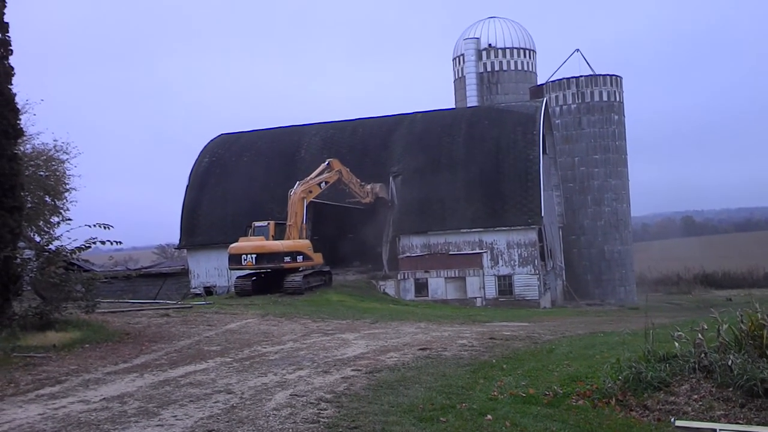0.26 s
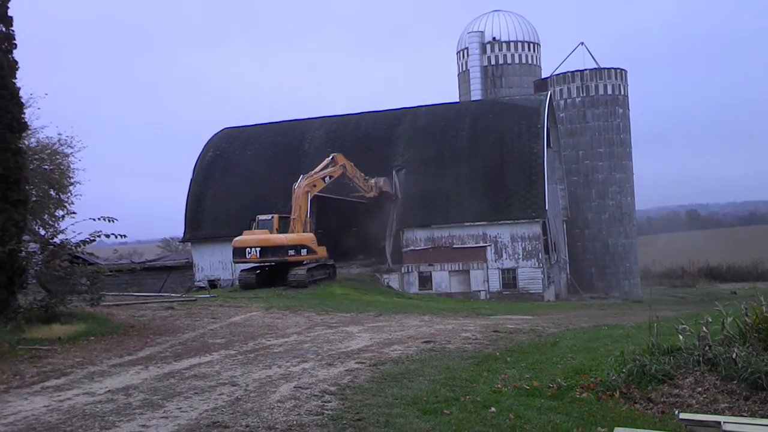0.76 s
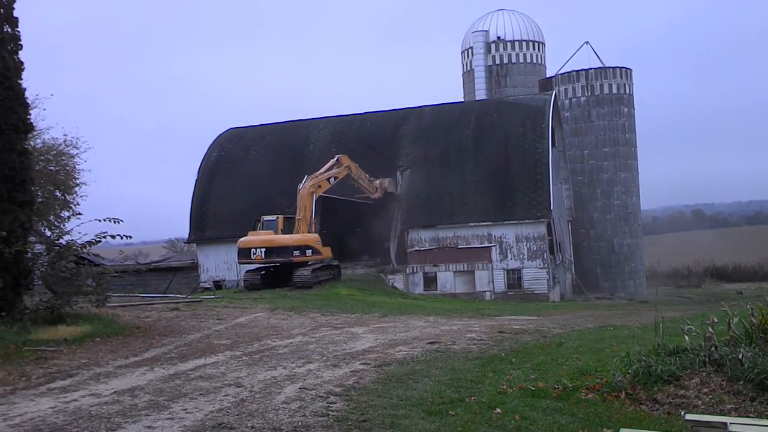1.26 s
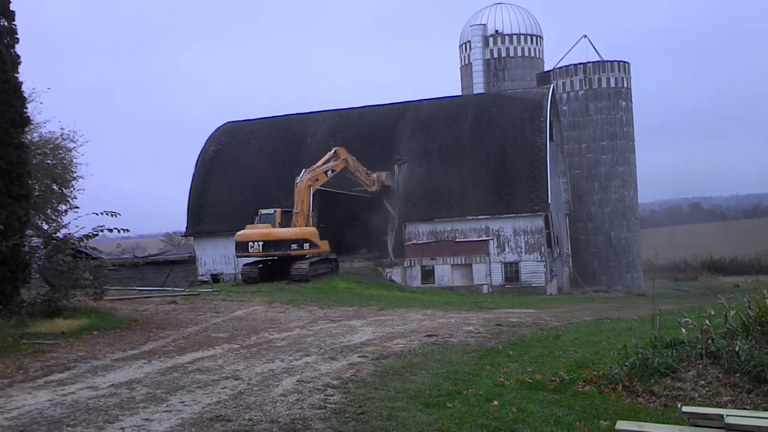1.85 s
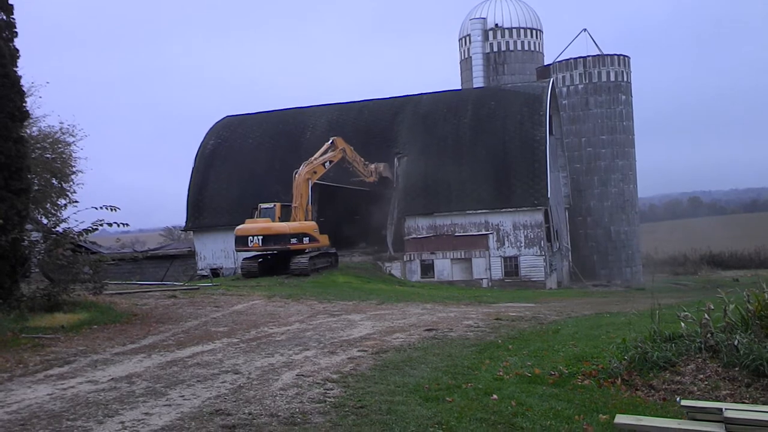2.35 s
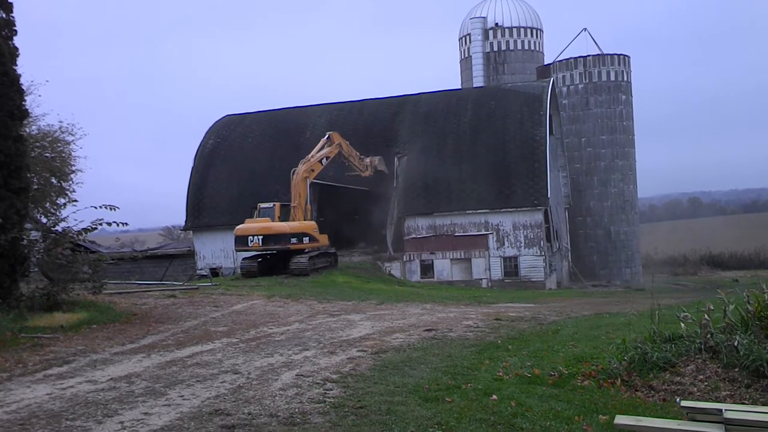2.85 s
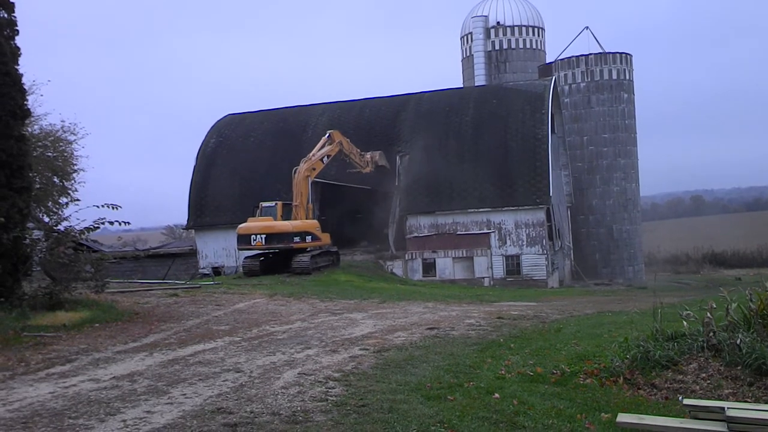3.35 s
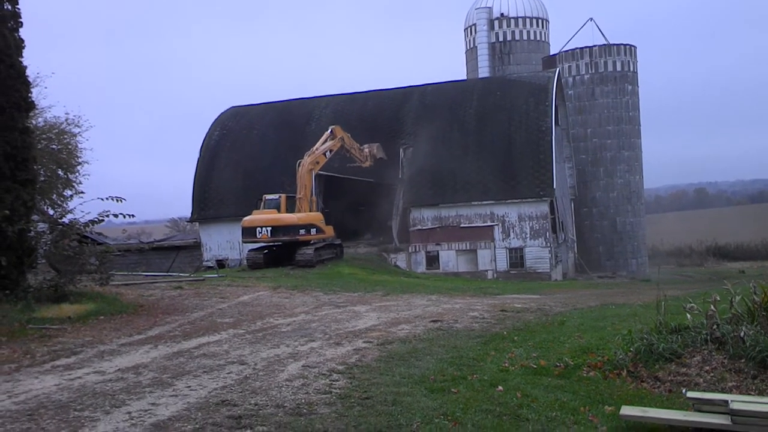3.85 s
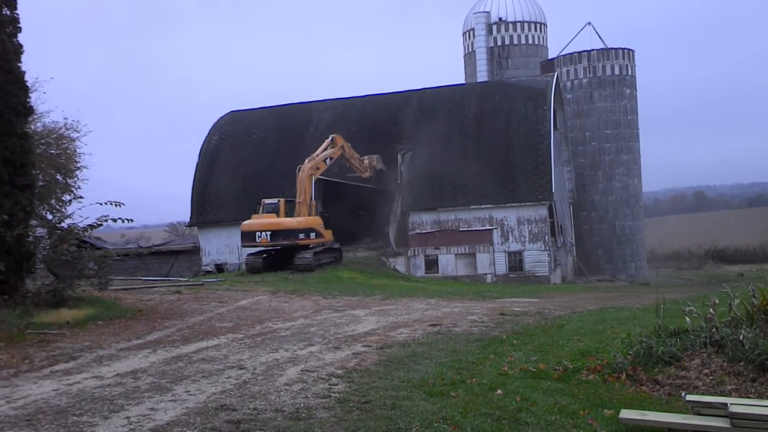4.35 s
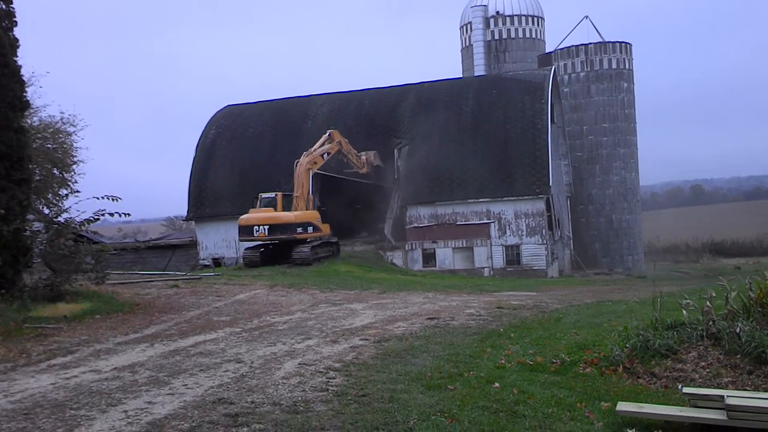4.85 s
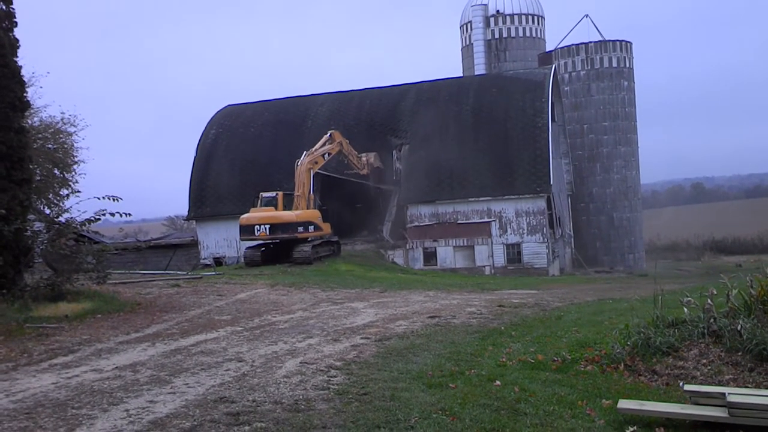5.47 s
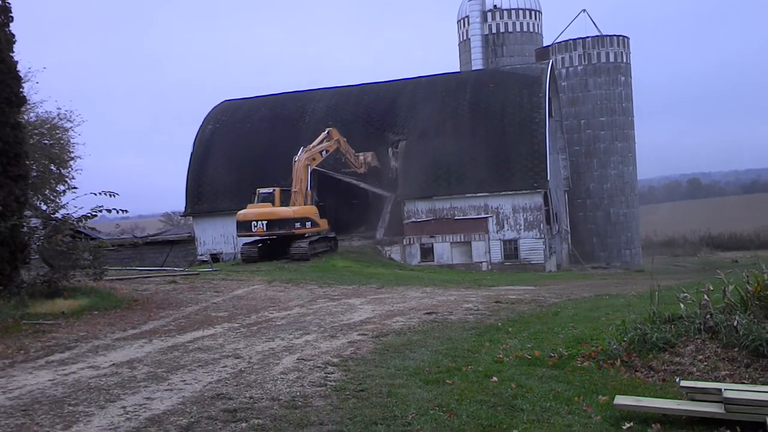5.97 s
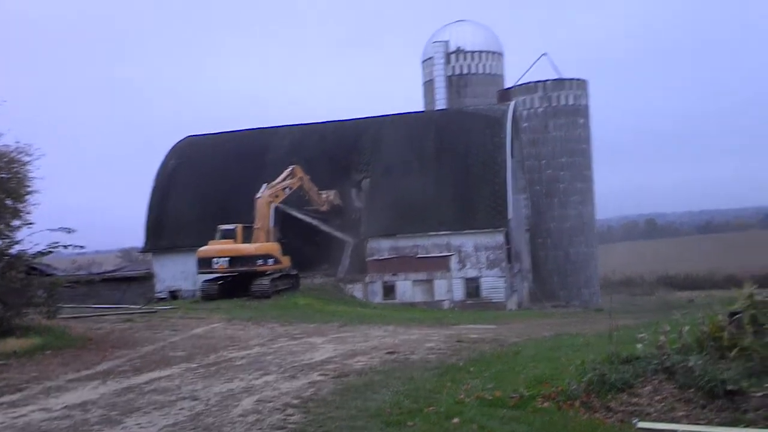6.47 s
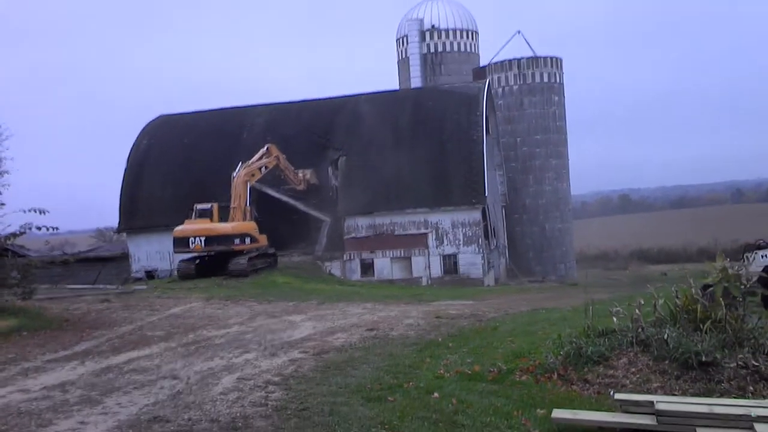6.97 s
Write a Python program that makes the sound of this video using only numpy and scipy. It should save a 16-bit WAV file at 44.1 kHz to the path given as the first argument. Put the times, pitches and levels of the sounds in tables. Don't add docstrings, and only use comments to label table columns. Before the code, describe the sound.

Steady low engine drone outdoors, with sharp dry wood cracks early, a lull, one very loud timber break, then knocking boards and sliding splinters.

```python
import sys
import numpy as np
from scipy import signal
from scipy.fft import next_fast_len
from scipy.io import wavfile
from scipy.ndimage import uniform_filter1d

SR = 44100
rng = np.random.default_rng(int(sys.argv[2]) if len(sys.argv) > 2 else 0)


def master_out(mix):
    frames = np.transpose(np.atleast_2d(mix))
    ceiling = np.clip(frames, -1, 1)
    pcm = np.round(ceiling * 32767).astype(np.int16)
    wavfile.write(sys.argv[1], SR, pcm)


def volts_from_decibels(level):
    exponent = np.asarray(level, float) / 20
    return 10 ** exponent


N = 317961
T = np.arange(N) / SR

# f/Hz, likeness [0..1]
LIKENESS = [(60, .98), (300, .9), (1000, .84), (3500, .78), (5400, .66), (9000, .68), (15000, .45)]


def evened(x):
    return x / np.sqrt(np.mean(x ** 2) + 1e-20)


def read(points, hz):
    f, value = np.transpose(points)
    return np.interp(np.log(hz + 1), np.log(f + 1), value)


def curves(rows):
    s, *columns = np.transpose(rows)
    return [np.interp(T, s, c) for c in columns]


def add(mix, s, sound):
    part = mix[max(round(s * SR), 0):][:len(sound)]
    part += sound[:len(part)]


def slow(most_hz):
    knots = rng.standard_normal(N // 100 + 402)
    lowpass = signal.butter(2, min(most_hz, 200), fs=SR / 100, output="sos")
    knots = signal.sosfilt(lowpass, knots)[400:]
    return np.interp(np.arange(N) / 100, np.arange(len(knots)), evened(knots))


def band(x, low_hz, high_hz):
    bandpass = signal.butter(2, [low_hz, min(high_hz, 20000)], "band", fs=SR, output="sos")
    return signal.sosfilt(bandpass, x)


def partner(left, other, same):
    return same * left + np.sqrt(1 - same ** 2) * other


def noise(colour, patchy_db, size):
    hz = np.fft.rfftfreq(size, 1 / SR)
    a, b, c, d, patches = rng.standard_normal((N // (size // 4) + 5, len(hz), 5)).T
    patches = uniform_filter1d(patches, size=size // 100, axis=0)
    patches = evened(uniform_filter1d(patches, size=6000 // size * 4, axis=1))
    same = np.clip(read(LIKENESS, hz), 0, 1)[:, None]
    left = a + 1j * b
    z = np.array([left, partner(left, c + 1j * d, same)])
    z *= volts_from_decibels(read(colour, hz)[:, None] + patchy_db * patches)
    z /= np.sqrt(hz + 10)[:, None]
    return evened(signal.istft(z, nperseg=size, noverlap=size * 3 // 4)[1][:, :N])


def scatter(per_s, spread_db, fall_s):
    landed = rng.random(N) < per_s / SR
    hits = volts_from_decibels(spread_db * np.minimum(rng.exponential(1, N), 4)) * landed
    return evened(signal.lfilter([1], [1, -np.exp(-1 / (fall_s * SR))], hits))


def valve(start_s, length_s):
    move_s = 0.092
    travel = np.minimum(T - start_s, start_s + length_s - T) / move_s
    return np.sin(np.pi / 2 * np.clip(travel, 0, 1))


def engine():
    # t/s, f/Hz, hum level/dB
    firing = [(0, 87.96, -19.5), (1.02, 88.3, -18.5), (1.63, 88.16, -20.5), (1.84, 86.05, -19.5),
              (2.3, 86, -19), (2.91, 86.9, -19), (3.03, 88.3, -18), (3.23, 88, -20.5), (3.65, 88.2, -19),
              (4.12, 89.5, -21.5), (5.2, 89.63, -21), (6.4, 89.7, -21), (7.21, 89.5, -21)]
    sixths_of_firing = [3, 8, 10.25, 15, 18, 20]
    orders_db = [-31, -26.5, -23.5, -22.5, -34, -34]
    # t/s,
    # length/s, level/dB, order [x firing rate], wander/Hz
    whines = [(-.1, 1.36, -41.5, 12.42, 4), (1.75, 1.05, -47, 9.02, 7), (2.78, .44, -42, 8.95, 6),
              (3.27, .36, -41, 8.86, 5), (1.7, 1.45, -45, 12.15, 12), (-.1, 2.2, -46, 15.4, 43),
              (2.4, .75, -43, 15.4, 35), (3.2, .55, -43, 15, 30), (4.6, 2.7, -48, 15.4, 50),
              (1.75, .6, -48.5, 19.7, 25), (1.7, 2.2, -54, 32.5, 150), (3.65, .4, -44, 4.25, 25),
              (4.2, 3.2, -36, 1.69, 1.5), (.1, 2.5, -47, 3.01, 1.5), (1.1, .6, -49, 12.4, 10),
              (3.45, .3, -47, 10.55, 6), (6.25, .75, -48, 12.62, 5)]
    hz, hum_db = curves(firing)
    turns = 2 * np.pi * np.cumsum(hz + .5 * slow(11.3)) / SR
    out = volts_from_decibels(hum_db + 0.99 * slow(23)) * np.cos(turns)
    out += volts_from_decibels(hum_db - 17 + 1.5 * slow(8.6)) * np.cos(2 * turns + 0.15)
    for sixths, db in zip(sixths_of_firing, orders_db):
        phase = 2 * np.pi * rng.random()
        out += volts_from_decibels(hum_db + db + 2.5 * slow(4)) * np.cos(sixths * turns / 6 + phase)
    for start_s, length_s, db, order, width_hz in whines:
        phase = 2 * np.pi * np.cumsum(order * hz + width_hz * slow(30.12)) / SR
        out += valve(start_s, length_s) * volts_from_decibels(db + 1.1 * slow(5.5)) * np.cos(phase)
    return np.sqrt(2) * out, turns


def rubble(turns):
    # f/Hz, level/dB per third octave
    rumble_colour = [(25, -33), (42, -30), (62, -6), (90, 1.5), (125, 1.5), (160, 2), (210, 2.5),
                     (260, -4.5), (350, 0), (500, -9.5), (700, -17)]
    boards_colour = [(350, -16), (520, -15), (650, -8), (800, -0.5), (1000, 1.5), (1200, -2.5), (1400, 2.5),
                     (1600, -13), (2200, -16)]
    splinters_colour = [(1100, -21.5), (1600, 5), (2200, 1), (2900, 1), (3300, -8.5), (4500, -24),
                        (6500, -35)]
    dust_colour = [(3200, -12), (4600, -15), (5500, -16), (6600, -4), (8000, -1), (11000, 3), (14000, 3.5),
                   (16500, 2.5)]
    # t/s, effort/dB
    effort = [(0, -2), (.82, 1), (1.17, 1.5), (1.36, -4.5), (1.95, 0.5), (2.39, 3), (3.19, -3.5), (3.55, 0),
              (4, -5.5), (4.2, 4.5), (4.56, 0.5), (4.68, 12.5), (4.85, 3.5), (5.4, 0.5), (6.1, 4),
              (6.45, -2.5), (6.77, -5.5), (7.21, 3)]
    rest_db = [-35.5, -36, -40.5, -42.5]
    follow = [.3, .7, .9, 1.01]
    # start/s, end/s
    quiet_s = (1.3, 4.05)
    effort_db = curves(effort)[0]
    rumble_db, boards_db, splinters_db, dust_db = (db + share * effort_db for db, share in zip(rest_db, follow))
    throb = 1 + 0.046 * np.cos(turns / 2) + 0.041 * np.cos(turns)
    falling = (T < quiet_s[0]) | (T > quiet_s[1])
    pieces = .55 * scatter(per_s=30, spread_db=0, fall_s=0.007) * falling
    out = volts_from_decibels(rumble_db + 2.5) * noise(rumble_colour, patchy_db=0.5, size=2048)
    out += volts_from_decibels(boards_db) * noise(boards_colour, patchy_db=0.67, size=512) * evened(throb + .15 * pieces)
    splinters = noise(splinters_colour, patchy_db=1, size=512)
    out += volts_from_decibels(splinters_db - 0.6) * splinters * evened(throb + .2 * pieces)
    dust = noise(dust_colour, patchy_db=-1, size=512)
    return out + volts_from_decibels(dust_db + 1.9) * dust * evened(throb + .25 * pieces)


def wind():
    # peak t/s, level/dB
    gusts = [
        (5.7, -34),
        (6.0, -28),
        (6.26, -21),
    ]
    breeze_db, rise_s, fall_s = -43.5, 0.097, 0.11
    lumps = rng.standard_normal((3, N))
    shared, left, right = (evened(band(band(v, 31, 55), 28, 58)) for v in lumps)
    force = volts_from_decibels(breeze_db + 3 * slow(1.5))
    for s, db in gusts:
        force += volts_from_decibels(db) * np.exp(np.minimum((T - s) / rise_s, (s - T) / fall_s))
    return volts_from_decibels(-6.5) * force * (shared + 0.36 * np.array([left, right]))


def cracks():
    # t/s, peak level/dB
    thin_snaps = [(0.203, -24), (0.308, -30), (.4604, -28), (0.605, -15), (0.6136, -21), (.861, -20.5),
                  (.977, -27), (1.048, -21), (1.168, -15), (1.181, -28), (1.2204, -27), (2.1176, -27),
                  (4.2746, -10), (4.4027, -17), (4.5208, -14), (4.7242, -19), (5.056, -18.5), (5.3228, -21),
                  (5.467, -24), (5.864, -22), (6.174, -23), (6.5633, -30), (7.157, -24)]
    # t/s, peak level/dB
    lath_cracks = [(0.2203, -22), (0.742, -22), (0.8127, -22), (.9497, -26), (1.002, -22), (1.2053, -14),
                   (1.2082, -13), (1.838, -24), (2.382, -22), (4.138, -23), (4.357, -19.5), (4.3817, -10),
                   (4.4548, -9.5), (5.1597, -16.5), (5.3027, -30), (5.3837, -23.5), (5.541, -34),
                   (5.5835, -27), (5.92, -17), (5.966, -30), (6.1744, -23.5), (6.2235, -22), (6.496, -20),
                   (6.8465, -24), (7.0743, -19)]
    # t/s, peak level/dB
    board_breaks = [(0.0595, -25), (4.5211, -20.5), (.9497, -29), (.601, -11), (0.714, -25), (1.1266, -31),
                    (2.4009, -29), (4.166, -22), (4.392, -14.5), (4.5275, -25), (5.8631, -28),
                    (5.8768, -30), (5.9334, -25), (6.133, -25), (6.3157, -28), (6.7685, -31),
                    (6.7857, -29.5), (6.9823, -29), (7.0213, -22), (7.031, -25)]
    # t/s, peak level/dB
    wall_crunches = [(.2158, -31), (.275, -37), (.283, -34.5), (.4529, -35), (.459, -34), (5.92, -34),
                     (4.0853, -40), (4.2354, -34), (4.562, -33), (4.881, -35), (5.1122, -36), (5.1266, -33),
                     (5.5014, -38), (6.2594, -39), (7.0225, -33)]
    # body level/dB, t60/s
    thickness = [
        (-10.5, 0.023),
        (-4.5, .021),
        (.5, .025),
        (7, 0.03),
    ]
    # t/s, peak level/dB, body level/dB, t60/s
    rafter = [
        (4.6068, 3, -3, 0.025),
        (4.6104, 3.5, -7.5, 0.037),
        (4.6191, 5, -9, 0.034),
        (4.6251, 3, -2, .019),
        (4.6334, -6, -5, 0.04),
        (4.6482, -10, -10, .03),
        (4.6837, -9, -7, 0.045),
    ]
    events = list(rafter)
    for rows, wood in zip((thin_snaps, lath_cracks, board_breaks, wall_crunches), thickness):
        events += [(*row, *wood) for row in rows]
    out, t = np.zeros((N, 2)), T[:SR // 16, None]
    fibres = rng.standard_normal((3, N + len(t)))
    fibres = fibres[0] + 0.74 * fibres[1:]
    body = evened(band(fibres, 1290, 3760)).T
    bright = evened(band(fibres, 4230, 13700)).T
    top = evened(band(fibres, 8700, 20000)).T
    click = 2.5 * signal.unit_impulse(300)
    for s, db, body_db, t60_s in events:
        at = slice(round(s * SR), round(s * SR) + len(t))
        envelope = volts_from_decibels(db - 3.5 - 60 * t / (0.83 * t60_s)) * np.minimum(t / 0.00026, 1)
        thin = np.clip(-body_db / 16, 0, 1)
        build = np.minimum(t / 0.0024, 1)
        parting = thin * top[at] + (1 - 0.49 * thin) * bright[at]
        parting += volts_from_decibels(body_db + 6.5) * build * body[at]
        add(out, s, envelope * parting)
        add(out, s + .0004, volts_from_decibels(db + .8) * band(click, 3000 + 3000 * thin, 20000)[:, None])
    return out.T


def knocks():
    # t/s, peak level/dB, f/Hz
    struck_boards = [(0.214, -15.5, 790), (0.281, -17.5, 715), (0.4585, -12, 838), (0.603, -15.5, 833),
                     (0.714, -25, 850), (.226, -23, 900), (.452, -20, 806), (.473, -24, 750),
                     (.815, -27, 1095), (.904, -26, 900), (.973, -24, 820), (1.003, -22, 1100),
                     (1.146, -24, 800), (5.604, -21, 960), (5.618, -21, 900), (5.647, -23, 1000),
                     (5.665, -23, 950), (5.798, -22, 851), (5.93, -24, 1810), (6.316, -23, 900),
                     (.743, -29, 1900), (1.169, -26, 3300), (1.208, -19, 2300), (.602, -22, 1600),
                     (4.277, -22, 1400), (4.185, -25, 900), (4.888, -23, 600), (4.93, -22.5, 880),
                     (4.94, -25, 900), (4.976, -23, 880), (4.987, -23, 850), (5.008, -25, 790),
                     (5.1596, -25, 2890), (5.218, -25, 750), (5.327, -28, 850), (5.369, -30, 750),
                     (5.984, -25.5, 720), (6.076, -27, 950), (6.1, -25, 720), (6.227, -24, 1000),
                     (6.268, -26, 894), (7.0212, -20, 2090), (7.034, -21, 755), (5.5012, -26, 1650),
                     (6.0584, -27, 1800), (6.1343, -22, 1480), (6.1745, -24, 1940), (6.2266, -26, 1550),
                     (6.2595, -27, 1500), (5.968, -31, 3450), (5.767, -31, 3000), (4.4555, -21, 2000),
                     (6.068, -25, 900), (6.085, -25, 1050),
                     (0.953, -17, 776), (0.993, -19.5, 1020), (1.13, -22, 860), (4.052, -20.5, 890),
                    (4.113, -22, 829), (4.135, -25, 760), (4.162, -18.5, 850), (4.297, -23, 822),
                    (4.392, -28, 950), (4.453, -19, 1316), (4.519, -16.5, 860), (4.61, -16, 1004),
                    (4.802, -23.5, 847), (4.877, -23, 867), (4.917, -25, 860), (4.964, -23, 850),
                    (5.545, -25, 947), (5.581, -21, 940), (5.776, -21, 930), (6.497, -20.5, 814),
                    (6.983, -19.5, 998), (7.024, -17.5, 752), (7.065, -18, 990), (7.158, -22, 854),
                    (7.174, -21, 965)]
    # t/s, peak level/dB, f/Hz, t60/s, build-up/cycles
    beams = [(4.1, -22, 210, 0.29, 5), (3.3, -36, 212, 0.3, 5), (4.44, -22, 140, 0.45, 6),
             (5, -33, 130, 0.41, 6), (5.57, -19, 226, 0.26, 5.1), (5.949, -17, 60, 0.38, 2.6),
             (6.17, -20, 36.6, 0.48, 3), (6.261, -23, 310, 0.36, 4.9), (6.3, -23, 152, 0.43, 5.1),
             (5.8635, -17.5, 2050, 0.075, 2.1), (5.876, -19.5, 1600, 0.07, 2.2),
             (5.19, -21.5, 680, .05, 2.1), (4.61, -20, 330, 0.1, 1.2), (4.61, -30, 27, .3, 1.1)]
    board_t60_s, board_cycles = .04, 1.63
    beam_hz, dull_db = 400, -8
    plank_hz = 1500
    modes = ((1, 2), (1.22, -6), (.8, -6.5), (1.6, -6.5), (2.3, -10), (3.1, -14))
    events = [(*row, board_t60_s, board_cycles) for row in struck_boards]
    out, t = np.zeros((N, 2)), T[:SR // 5, None]
    for s, db, hz, t60_s, cycles in [*events, *beams]:
        ring = 0
        for ratio, mode_db in modes:
            dulled = (ratio != 1) * (hz < beam_hz) + (ratio > 1.5) * (hz > plank_hz)
            mode = np.sin(2 * np.pi * (ratio * hz * t + rng.random()))
            ring = ring + volts_from_decibels(mode_db + dulled * dull_db) * mode
        fall_s = np.clip(t60_s * min(1, plank_hz / hz), .015, .5)
        add(out, s, volts_from_decibels(db - 60 * t / fall_s) * np.minimum(t * hz / cycles, 1) * ring)
    return out.T


def yard(x):
    # f/Hz, t60/s
    decay = [(300, 0.4), (1000, 0.54), (3000, 0.7), (6000, 0.45), (12000, 0.37)]
    taps = np.zeros((2, SR // 2))
    at = np.arange(200, SR // 2 - 20, 20)
    at = at + rng.integers(0, 20, (2, len(at)))
    np.put_along_axis(taps, at, rng.choice([-1., 1.], at.shape), 1)
    hz, t, z = signal.stft(taps, SR, nperseg=256)
    tail = signal.istft(z * volts_from_decibels(-60 * t / read(decay, hz)[:, None]), SR, nperseg=256)[1]
    return signal.fftconvolve(x[None], tail / np.linalg.norm(tail[0]), axes=1)[:, :N]


def showers():
    # t/s, length/s, level/dB, centre f/Hz,
    # width/Hz
    debris_falls = [(0.612, 0.12, -40, 7060, 2500), (1.608, .014, -38, 2100, 900),
                    (1.618, .022, -32.5, 2500, 1800), (5.52, .24, -38, 3700, 900),
                    (5.56, .14, -34, 1700, 700), (4.67, .04, -30, 7000, 9000), (.6, .07, -37, 1900, 1600),
                    (1.75, 1.1, -50, 8500, 5000), (3.2, .7, -51, 12000, 6000),
                    (4.712, 0.12, -29, 5700, 2000), (5.8, .5, -46, 4000, 2200),
                    (4.605, .06, -28, 600, 400), (1.17, .18, -45, 11000, 8000),
                    (4.72, .1, -33, 9000, 5000), (.605, .12, -40, 10000, 5000),
                    (.45, .03, -40, 8000, 8000), (4.74, .26, -37, 4800, 2600),
                    (5.5, 0.36, -39, 3500, 1500), (5.565, 0.17, -30, 2500, 2200),
                    (5.58, 0.18, -39, 6800, 3500), (6.764, 0.04, -40.5, 3600, 3000),
                    (7.019, 0.12, -39, 3750, 1800), (4.09, 0.17, -28, 800, 350),
                    (4.72, 0.2, -33.5, 850.1, 398), (4.9, .18, -36, 880, 300),
                    (5.53, .17, -30.5, 970, 350), (5.63, 0.077, -29, 950, 400),
                    (5.72, 0.6, -34.5, 850, 400), (6.98, 0.24, -37, 912, 400),
                    (4.06, 0.35, -37.5, 2000, 900),
                    (4.07, 0.15, -32, 230, 230), (4.6, 0.091, -30, 240, 260), (5.5, 0.22, -33, 250, 250),
              (5.56, .3, -36, 360, 130), (5.75, .55, -33.5, 250, 300), (7.0, 0.38, -32.5, 290, 270),
              (4.63, .28, -34, 2600, 2300), (4.62, 0.22, -32, 8500, 6600), (5.52, 0.28, -32, 1640, 1000),
              (5.862, .04, -27.5, 2000, 900), (4.606, .045, -22, 4600, 1700), (4.608, .05, -20, 1700, 700),
              (4.63, 0.11, -33, 4600, 1500), (5.84, .5, -43, 2070, 1410), (7.01, .25, -36, 2100, 1200),
              (.4, 0.58, -40.5, 890, 503), (.94, .12, -37, 2900, 3000), (4.1, 0.25, -41, 9000, 7000),
              (6.04, .3, -36, 1600, 1400), (4.37, 0.27, -36, 520, 400), (4.85, 0.086, -33, 345, 300)]
    out = np.zeros((N, 2))
    fine = .5 + .5 * scatter(per_s=500, spread_db=2, fall_s=0.0039)
    coarse = .65 + 0.38 * scatter(per_s=100, spread_db=3, fall_s=0.0083)
    for s, length_s, db, hz, width_hz in debris_falls:
        u = np.linspace(0, 1, round(1.2 * length_s * SR))
        same = np.clip(read(LIKENESS, hz) - (hz > 3000) * 0.29, 0, 1)
        raw = rng.standard_normal((2, len(u) + 900))
        left, other = band(raw, hz - width_hz / 2, hz + width_hz / 2)[:, 900:]
        hiss = evened(np.array([left, partner(left, other, same)]))
        grain = (fine if hz > 1500 else coarse)[round(s * SR):][:len(u)]
        envelope = np.sin(np.pi * u[:len(grain)] ** 0.45) ** 1.4
        add(out, s, (volts_from_decibels(db) * envelope * grain * hiss[:, :len(grain)]).T)
    return out.T


def chips():
    # t/s, peak level/dB, f/Hz
    flying = [(.868, -33, 10000), (1.2943, -38, 8000), (4.263, -33, 8000), (4.3166, -32, 10500),
              (4.365, -30, 12500), (4.387, -22, 9000), (4.436, -31, 13000), (4.462, -28, 9000),
              (5.7002, -29, 12500), (5.737, -33, 9500), (5.7745, -30, 11000), (5.781, -33, 9010),
              (5.812, -26, 11000), (5.8199, -27, 11500), (5.8638, -17, 11200), (5.869, -22, 10500),
              (5.877, -22, 11000), (5.885, -29, 14000), (5.9033, -28, 9860), (5.924, -22, 8500),
              (5.9661, -24, 6800), (5.975, -29, 10000), (6.0095, -28, 10600), (6.031, -24, 10000),
              (6.042, -28, 13000), (6.072, -31, 11000), (6.1733, -14.5, 12000), (6.3163, -32, 9750),
              (5.068, -29, 9000), (5.168, -29, 10000), (5.343, -31, 9000), (5.458, -30, 11000),
              (5.473, -33, 10500), (6.568, -30, 10500)]
    # t/s, peak level/dB, f/Hz
    splits = [(.6005, -17, 9000), (.8125, -25, 8000), (1.1682, -11, 11200), (1.1745, -18, 12500),
              (1.1815, -15, 12000), (1.205, -7, 12500), (1.2082, -8.5, 9500), (1.2205, -21, 11000),
              (4.2755, -16, 8000), (4.2805, -25, 9500), (4.382, -14, 11500), (4.4548, -14, 11000),
              (4.5215, -19, 9000), (4.6072, -5, 6000), (4.382, -21, 4600), (4.4548, -20, 4200),
              (1.2052, -20, 4500), (6.176, -27, 3800)]
    out, t = np.zeros((N, 2)), T[:SR // 30, None]
    # rows, t60/s, half width re f
    for rows, t60_s, width in ((flying, .017, .19), (splits, .011, .33)):
        for s, db, hz in rows:
            a, b, c = rng.standard_normal((3, len(t) + 200))
            ports = np.array([a + .6 * b, a + 0.72 * c])
            fizz = evened(band(ports, hz * (1 - width), hz * (1 + width))[:, 200:]).T
            add(out, s, volts_from_decibels(db - 2 - 60 * t / t60_s) * np.minimum(t / .0003, 1) * fizz)
    return out.T


def scene():
    hum, turns = engine()
    machine = hum + rubble(turns) + wind()
    wood = cracks() + knocks()
    return machine + wood + volts_from_decibels(-13) * yard(wood[0]) + showers() + chips()


def band_limit(x):
    return signal.sosfilt(signal.butter(12, 16090, fs=SR, output="sos"), x)


def record(dry):
    # f/Hz, level/dB
    cavity = [(2500, 0), (4200, 7.5), (5700, 5.5), (7500, 2), (10000, -2.5), (16000, -9.5)]
    # f/Hz, level/dB
    port_balance = [(60, 3), (110, 3.5), (200, 3), (380, 3.5), (700, -0.5), (1290, 0), (2380, -4.5),
                    (4400, 2.5), (8120, -5.5), (15000, -11)]
    # f/Hz, phase/rad
    left_lead = [(0, 0.5), (1290, -1.0), (1550, -1.66), (1810, -1.2), (2760, -1.48), (5860, -4),
                 (6980, -4.5), (9730, -5.5), (11400, -5), (15700, -8.5)]
    edge_hz = 15650
    size = next_fast_len(N + 2048)
    hz = np.fft.rfftfreq(size, 1 / SR)
    half_db = read(port_balance, hz) / 2
    lead_rad = np.interp(hz, *np.transpose(left_lead))
    ports = volts_from_decibels(read(cavity, hz) + np.array([half_db, -half_db]))
    ports = ports * np.exp(1j * np.outer([1, 0], lead_rad))
    ports *= np.clip((edge_hz - hz) / 300 + 1, 0, 1)
    heard = np.fft.irfft(np.fft.rfft(dry, size) * ports, size)[:, :N]
    return band_limit(np.clip(heard, -1, 1))


dry = scene()
out = record(dry)
master_out(out)
```